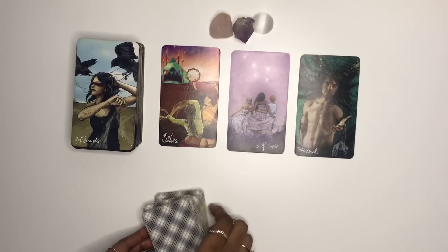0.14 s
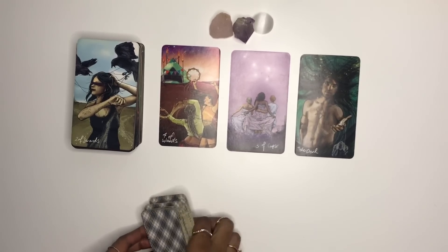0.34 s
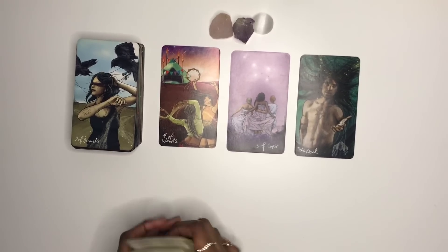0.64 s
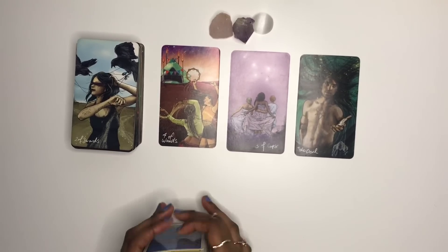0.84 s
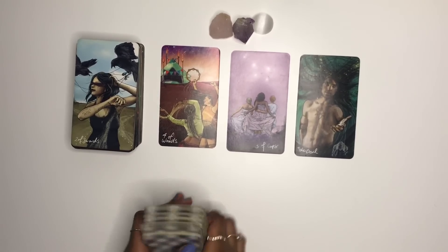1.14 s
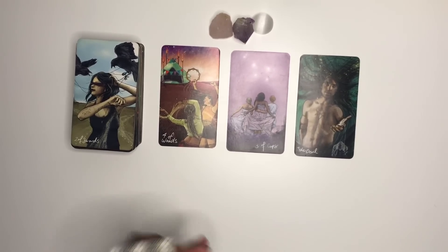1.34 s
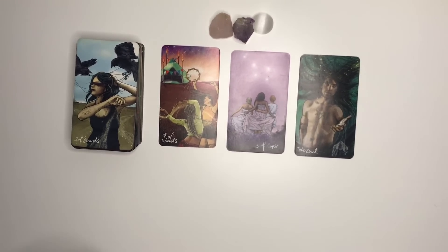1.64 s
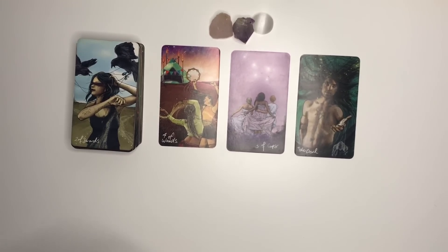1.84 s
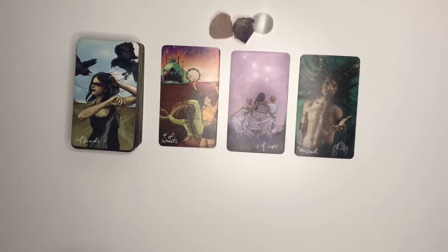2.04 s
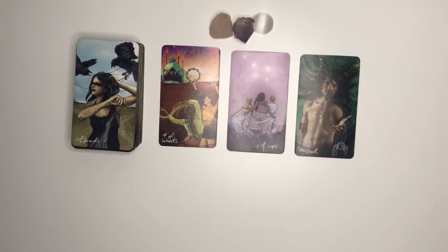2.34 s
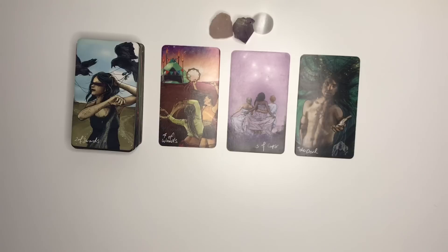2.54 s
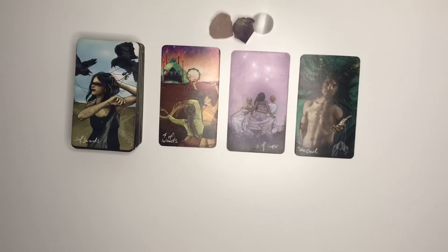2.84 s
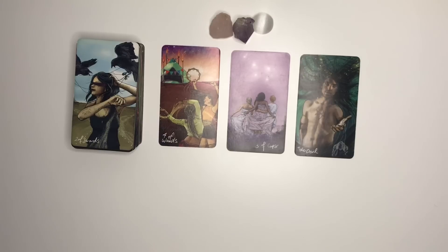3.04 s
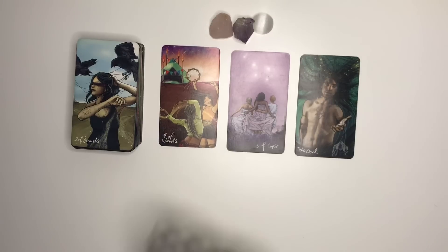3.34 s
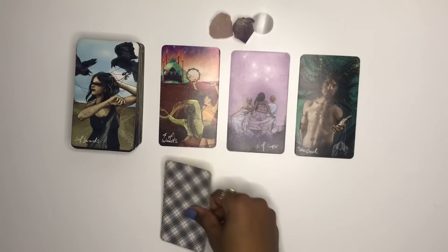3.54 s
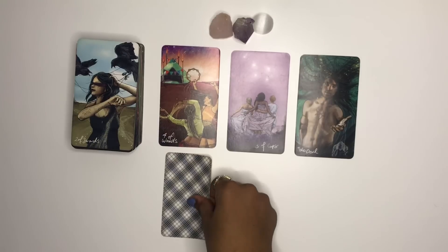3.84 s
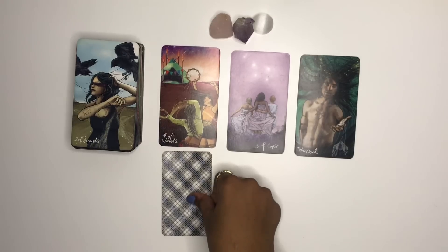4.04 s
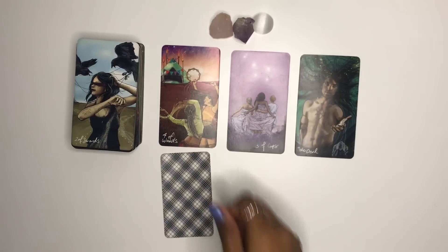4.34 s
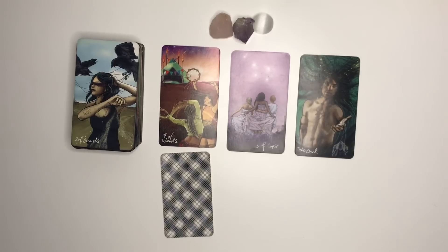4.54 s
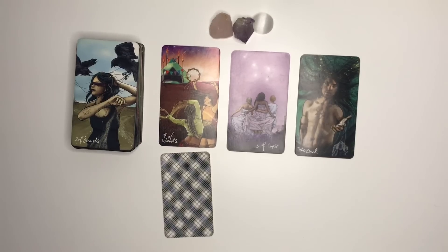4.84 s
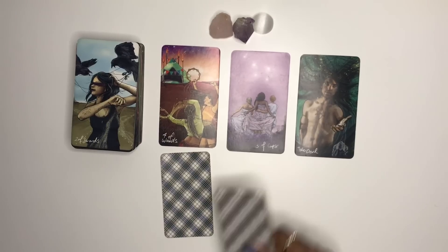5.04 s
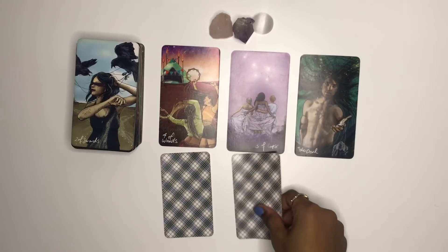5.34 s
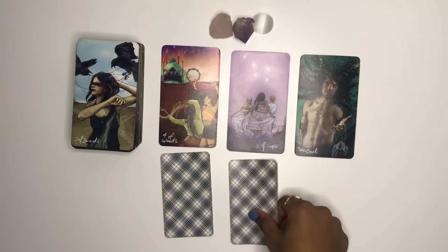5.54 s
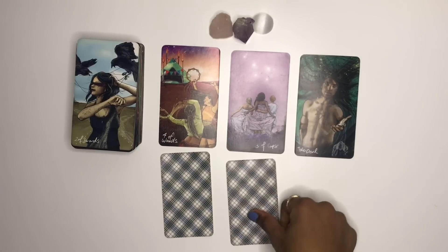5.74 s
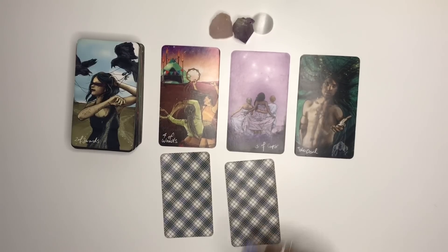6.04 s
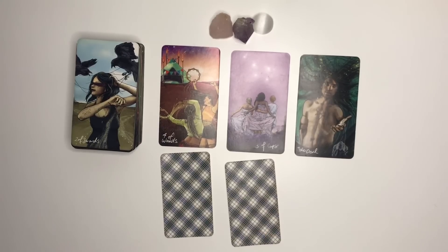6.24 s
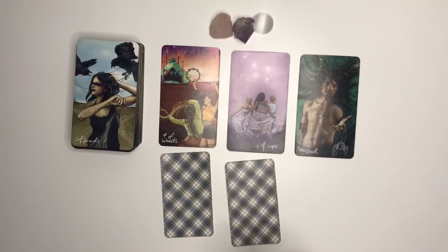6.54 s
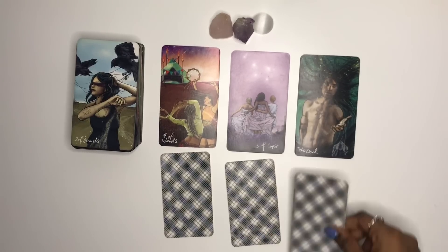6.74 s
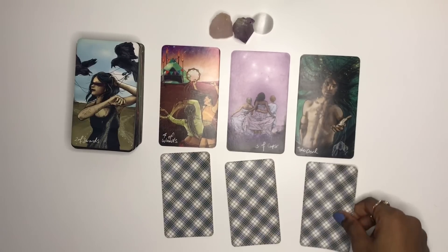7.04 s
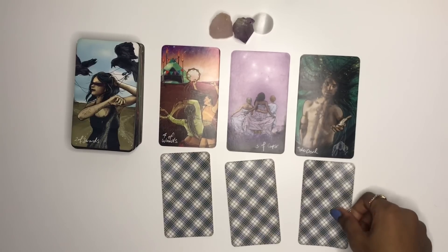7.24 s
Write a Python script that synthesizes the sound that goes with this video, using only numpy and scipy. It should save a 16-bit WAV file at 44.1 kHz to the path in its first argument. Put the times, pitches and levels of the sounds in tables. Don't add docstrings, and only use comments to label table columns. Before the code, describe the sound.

A close, mono view of cards handled at a wooden table in a small quiet room with faint bassy air and a short tail. From 0 to 0.7 s there are soft low hand thumps, light ticks and rustle. At about 0.83 and 1.04 s the deck halves slap together in tight clattering bursts, with a little friction and a thin high flick at 1.42. Three crisp woody edge knocks follow at 1.91, 2.09 and 2.30 s, the last slightly softer. Almost quiet until a loud, sharp card snap at 3.32, then clicks and a papery slide at 3.6-4.05 as the card is set down and pressed. A small early slip at 4.91 leads into a second snap at 4.94, with sliding and taps from 5.2 to 5.8. A third snap comes at 6.56, then light placing ticks, short slides and clear little clicks at 7.27 and 7.35.

```python
import sys
import numpy as np
from scipy import signal
from scipy.io import wavfile
from scipy.ndimage import uniform_filter1d

SR = 44100
rng = np.random.default_rng(int(sys.argv[2]) if len(sys.argv) > 2 else 0)


def pcm_store(signal):
    levels = np.round(np.clip(np.atleast_2d(signal), -1, 1) * 32767)
    wavfile.write(sys.argv[1], SR, levels.astype(np.int16).T)


def volts_from_decibels(level):
    exponent = np.asarray(level, float) / 20
    return 10 ** exponent


N = 325437

# frequency_hz, density_db [dB per Hz]
AIR_SPECTRUM = [(25, -54), (45, 7.5), (110, -3), (250, -12.5), (1000, -20.5), (8000, -33), (12500, -30.5),
                (16000, -34.5)]

# middle_s, length_s, hiss_db, rustle_db
CARD_SWISHES = [(0.017, 0.027, -60.5, -51.5), (1.547, 0.028, -53, -73), (0.266, 0.042, -44.5, -48),
                (0.547, 0.057, -51, -49.5), (0.738, 0.025, -45, -30), (1.253, 0.024, -47.5, -47.5),
                (1.348, 0.029, -43.5, -37.5), (2.982, 0.041, -48, -54), (3.305, 0.075, -32.5, -43),
                (4.053, 0.017, -48, -34), (4.634, 0.024, -41.5, -43), (6.105, 0.081, -49.5, -69),
                (6.283, 0.012, -62, -36), (6.561, 0.074, -36.5, -43.5)]
# frequency_hz, density_db [dB per Hz]
HISS_SPECTRUM = [(1000, 8), (2000, 4), (3500, 7.5), (6000, 8.5), (9000, 4), (13000, 5.5), (16000, 2.5)]
# frequency_hz, width_hz, level_db
RUB_BANDS = [(2080, 400, -5), (2980, 460, -1.5), (3850, 700, -3), (4800, 900, -19), (6000, 1100, -10.5)]

# start_s, hold_s, level_db, rise_s, fall_s
HAND_LEANS = [(0.03, 0.015, -22.5, 0.089, 0.21), (0.17, 0.036, -21.5, 0.059, .1),
              (0.28, 0.013, -21.5, 0.068, 0.11), (0.992, .004, -44, 0.074, .06),
              (1.14, 0.0036, -19, .13, 0.11), (3.946, .004, -39, 0.25, 0.17),
              (4.122, .004, -27.5, 0.18, 0.33), (5.382, .004, -29, 0.077, 0.08),
              (5.638, .004, -34.5, 0.36, 0.045), (5.848, 0.0037, -24.5, 0.19, 0.056),
              (6.96, 0.034, -34.5, 0.033, 0.18), (7.25, 0.043, -34, 0.17, 0.039)]
# start_s, hold_s, level_db, rise_s, fall_s
DECK_SQUEEZES = [(0.15, 0.13, -53.5, 0.54, 0.11), (0.728, 0.0044, -41.5, 0.097, 0.11),
                 (0.85, 0.043, -54, 0.061, 0.25), (1.034, 0.097, -39.5, 0.071, 0.11),
                 (1.36, .01, -52, 0.099, 0.21), (2.99, .02, -56.5, 0.51, 0.27),
                 (3.32, .004, -36, 0.0043, 0.13), (4.05, 0.11, -55.5, 0.03, 0.29),
                 (4.95, .004, -48, 0.11, 0.16), (6.338, 0.0084, -55.5, 0.56, 0.2),
                 (6.565, 0.026, -48.5, 0.0079, 0.1)]
# start_s, hold_s, level_db, rise_s, fall_s
CARD_DRAWS = [(0.45, 0.34, -63, 0.13, 0.15), (0.83, .003, -52, .004, 0.03), (1.14, .01, -52, 0.16, 0.1),
              (1.3, 0.23, -68, 0.08, 0.054), (2.65, 0.015, -67, 0.47, 0.28), (3.2, .11, -60.5, 0.31, 0.027),
              (3.33, 0.29, -70.5, 0.0073, 0.22), (4.042, 0.0045, -53, 0.057, 0.078),
              (4.514, 0.018, -70.5, 0.15, 0.56), (4.82, 0.16, -54, 0.093, 0.044),
              (5.765, 0.0045, -54.5, 0.15, 0.073), (6.48, 0.08, -58, 0.092, 0.032),
              (6.57, .11, -77, 0.0095, 0.17)]
# start_s, hold_s, level_db, rise_s, fall_s
HALVES_SPLAY = [(1.057, .002, -26.5, 0.0076, 0.056)]
# start_s, hold_s, level_db, rise_s, fall_s
CARD_DRAGS = [
    (3.745, 0.02, -39, 0.031, 0.14),
    (3.875, 0.02, -43, 0.015, 0.16),
    (4.0, .03, -54, 0.28, .06),
    (5.252, 0.14, -55.5, 0.15, 0.13),
    (5.42, 0.14, -53, 0.053, 0.36),
    (5.54, 0.0091, -45.5, 0.021, 0.087),
    (5.7, 0.049, -49, 0.14, 0.067),
    (7.0, 0.069, -53.5, 0.18, .06),
    (7.13, 0.081, -53, .05, 0.12),
    (7.285, 0.045, -44, 0.045, 0.091),
]
# hiss_db, rub_db, rustle_db, rumble_db
LEAN_LAYERS = (-50.5, -51, -40, 0.5)
SQUEEZE_LAYERS = (-24, -2.5, -0.5, -11)
DRAW_LAYERS = (-1, -5, -5, -15)
SPLAY_LAYERS = (-35, 2.5, -15, -19.5)
DRAG_LAYERS = (-15.5, 4, -14.5, -14)

# start_s, ring_db, pitch_hz, table_thump_db, crack_db
CARD_TOUCHES = [(0.1583, -44, 1830, 24, -5), (3.622, -24.5, 1940, -38, -18), (3.7219, -27, 2980, -7, -14),
                (3.7388, -5, 3760, -25, -26), (3.8349, -26.5, 2950, -11.5, -13),
                (3.8681, -8.5, 3210, -32.5, -14.5), (5.1983, -20.5, 2250, -40, -14),
                (5.4912, -27, 3200, -12.5, -25), (5.6876, -32, 3570, -10.5, -27),
                (6.8557, -24, 2110, -57, -48), (7.0905, -24, 3830, -15, -10), (7.1078, -22, 3860, -15, -29),
                (7.1362, -24.5, 3900, -30, -19), (7.1485, -28.5, 3900, -2, -12),
                (5.2821, -29.5, 2860, -23, -23), (5.772, -15.5, 5670, -21, -5),
                (7.208, -29.5, 3900, -7, -14.5), (7.2266, -31.5, 3850, -2, -10),
                (7.2455, -32, 3830, -16, -3), (7.3515, -6, 3960, -14.5, -2.5)]
# start_s, ring_db, pitch_hz, deck_body_db, crack_db
HAND_FIDGETS = [(0.3813, -35.5, 2170, -1.5, -27), (0.4548, -37.5, 1700, -1.5, 3), (0.52, -33.5, 3100, 0, 4),
                (0.5296, -33, 1920, -9, 1), (1.1485, -29, 4430, -11, -20), (1.1886, -26.5, 3650, -21, -1),
                (1.4872, -46.5, 3380, -12, 14), (1.6327, -45, 2400, 3.5, 9), (2.575, -42.5, 2000, -2, 5),
                (2.8434, -42.5, 1710, 6.5, -5), (3.243, -26, 4400, -10.5, -13.5),
                (4.4388, -32, 4300, 0, -9), (4.6126, -25.5, 1870, 3, -1), (4.6652, -25, 4630, -8, -0.5),
                (5.933, -46, 4510, 0, 0), (6.2667, -29.5, 2920, -2.5, -2), (6.2796, -32.5, 1900, 8, -2),
                (6.5237, -22, 1810, -10, -15)]
# start_s, ring_db, pitch_hz, deck_body_db, crack_db
SMALL_SCUFFS = [(3.2965, -21, 2900, -3.5, -1), (3.305, -25.5, 2300, -25, -4), (1.2, -39, 2800, -14, -17),
                (6.535, -23, 3500, -21, -10), (8.1, -29.5, 3800, -15, -3), (3.47, -42, 4200, -21, 1),
                (0.23, -34, 1830, 2, -8), (0.37, -41, 6400, -7, -14), (0.7213, -29, 1950, -5, -11),
                (0.84, -16, 2600, -4, -20), (1.1, -38, 3400, -3.5, -17), (4.3, -44, 4000, -23, -12.5),
                (8.6, -21, 2000, 10, -10), (4.618, -20.5, 4750, -10, -8.5)]
# start_s, ring_db, pitch_hz, table_thump_db, crack_db
HAND_PRESSES = [
    (4.0448, -18.5, 2880, 0, 3.5),
    (5.2775, -36, 3000, 3, -2.5),
    (5.5446, -17.5, 3020, -16, -18),
    (5.7715, -16, 4010, -11, 0.5),
    (6.9526, -32.5, 1790, -9, -18),
]
# start_s, peak_db, pitch_hz, decay_t60_s
FRAME_JOLTS = [
    (0.17, -24.5, 316, 0.061),
    (0.83, -33, 60, 0.22),
    (0.995, -27, 318, 0.18),
    (0.873, -17, 178, .17),
    (3.317, -22, 62, 0.26),
    (3.316, -20.5, 120, 0.16),
    (4.944, -29, 130.6, 0.36),
    (6.563, -26.5, 61, 0.2),
    (6.562, -19.5, 400, 0.17),
    (1.042, -20, 460, 0.068),
]
# start_s, ring_db, pitch_hz, table_thump_db, deck_body_db
HALF_SLAPS = [(0.827, -10.5, 1860, 2, 3), (0.834, -31, 2600, -16, -8), (0.839, 0, 2070, -10.5, -25),
              (0.8453, -8, 2080, -6, -9), (0.8588, -10, 1650, -10, -14), (0.8505, -17, 2280, -15, -4),
              (0.867, -15, 1910, -14, -6), (1.0385, -7.5, 2280, -31, -13), (1.0407, -2.5, 2080, -52, -38),
              (1.0522, -1.5, 1920, -26, -29), (1.054, -5, 2010, -38, -18), (1.0455, -15, 2300, -22, -18),
              (1.0599, -16, 2600, -32, -20), (1.066, -29, 2830, -22, -15)]
# start_s, ring_db, pitch_hz, table_thump_db, crack_db
NAIL_FLICKS = [
    (1.4243, -19, 6500, -33, 0),
    (7.126, -31.5, 3920, -2.5, -22),
    (7.2742, -3.5, 3865, -30, -13),
]
# start_s, ring_db
EDGE_KNOCKS = [
    (1.9135, -3.5),
    (2.0932, -4),
    (2.2962, -5.5),
]
# pitch_hz, table_thump_db, deck_body_db, crack_db
KNOCK_SHARES = (2029, -30, -10, -6)
# start_s, ring_db, pitch_hz
EDGE_LANDINGS = [
    (1.9143, -2, 2020),
    (2.0939, -4.5, 1980),
    (2.2976, -3.5, 2040),
]
# start_s, peak_db, first_hz, last_hz, length_s
CARD_WHIPS = [
    (3.3157, 1, 8730, 2940, .0022),
    (4.9438, -8.5, 7020, 2510, 0.0027),
    (6.5602, -10, 15070, 3960, .002),
]
# start_s, ring_db, pitch_hz, deck_body_db, crack_db
CORNER_SCRAPES = [
    (3.3162, -1, 3700, -25.5, -14),
    (4.9106, -14.5, 2875, -30, -10),
    (4.9442, -2, 3880, -34.5, -9),
    (6.5602, -2.5, 4030, -42, -3),
]
# start_s, ring_db, pitch_hz, deck_body_db, crack_db
CARD_SNAPS = [
    (3.3171, 1, 1750, -12, -18),
    (4.9108, -10.5, 1984, -7.5, -21.5),
    (4.9453, -3.5, 1860, -6, -11),
    (4.9548, -14, 1700, -17, 3),
    (6.5612, -2.5, 1810, -16.5, -18),
]
# start_s, ring_db, pitch_hz
DECK_FLEXES = [
    (3.3176, -3, 690),
    (4.9114, -16, 560),
    (4.9462, -13, 520),
    (4.9579, -12, 634),
    (6.5661, -9, 990),
]

# multiple, level_db, decay_t60_s
TICK_MODES = [(.55, -4.5, 0.007), (0.748, 0, 0.006), (1, 4.5, 0.007), (1.35, 1, 0.004), (1.8, 3, 0.0033)]
SLAP_MODES = [(.65, -7, 0.0051), (1, 6, 0.011), (1.27, 0, 0.014), (1.75, 1, 0.0067), (2.2, -3.5, 0.0063),
              (2.7, -3.5, 0.0046)]
FLICK_MODES = [(.485, -3, 0.013), (1, 6, 0.02), (1.179, -10, 0.01), (1.4, -7, .005), (1.88, 1.5, .005)]
KNOCK_MODES = [(.8, -24, .004), (1, 4, 0.0059), (1.47, -5, 0.005), (1.65, -3, 0.011), (2.2, -14, 0.004),
               (2.72, -9.5, 0.005)]
LANDING_MODES = [(1, -5, 0.015), (1.66, -12.5, 0.0049), (2.2, -21, 0.0046)]
CORNER_MODES = [(.76, -3, .005), (1, 1, .005), (1.39, 2.5, 0.0063), (1.76, 0, .0045), (2.27, -7.5, .003)]
SNAP_MODES = [(0.6, -25, 0.024), (1, 8, 0.011), (1.25, -26, .005), (1.58, 1.5, 0.006)]
FLEX_MODES = [(1, 2, 0.014), (1.35, -7, 0.01)]

# frequency_hz, level_db, decay_t60_s
TABLE_MODES = [(128.7, -4, 0.2), (154, -8, 0.2), (176.9, 0.5, 0.29), (294.2, -4, 0.06), (392, -8.5, 0.14)]
# frequency_hz, level_db, decay_t60_s
LOOSE_DECK_MODES = [(350, -5.5, 0.016), (478, -3, 0.077), (510, -9.5, 0.15), (696, 18, 0.024),
                    (970, -40.5, 0.019)]
# frequency_hz, level_db, decay_t60_s
PILE_MODES = [(290, -3.5, 0.011), (405, -12.5, 0.091), (692, 0, 0.044), (891, 1.5, 0.063), (1010, 5, 0.018),
              (1263, -23, 0.011)]
# frequency_hz, level_db, decay_t60_s
BLOCK_MODES = [(317, -8, 0.029), (404, -13.5, 0.058), (480, -14, 0.024), (555, -14.5, 0.047),
               (692, -9, 0.07), (760, -6, 0.03), (854, -2, 0.029), (950, -5.5, 0.026)]
# frequency_hz, level_db, decay_t60_s
THUMBED_DECK_MODES = [(480, 1, 0.021), (590, -13.5, 0.06), (636, 3.5, 0.015), (705, 8, 0.016),
                      (990, 2, 0.032)]
# frequency_hz, level_db, decay_t60_s
BOARD_MODES = [(318, -4, .18), (398, -5, .17), (545, -8, .18), (596, -2, .14), (686, 0, .12), (760, -8, .2),
               (875, -8, .13), (1000, -4, .18), (1158, -9, .17), (1351, -8, .07), (1735, -10, .14),
               (1870, -12, .12), (2180, -10, .14)]

# delay_s, level_db
WALL_ECHOES = [
    (.0097, -17.5),
    (0.0184, -17.5),
    (0.0258, -22),
]
# frequency_hz, decay_t60_s, level_db
ROOM_DECAY = [(121, 0.066, -7.5), (328, 0.22, 5.5), (862, 0.23, -2.5), (2320, 0.21, -4), (6000, 0.18, -4),
              (12150, 0.073, 0.5)]


def evened(x):
    return x / np.sqrt(np.mean(x ** 2) + 1e-20)


def peaked(x):
    return x / (abs(x).max() + 1e-12)


def read(points, hz):
    f, value = np.transpose(points)
    return np.interp(np.log(hz + 1), np.log(f + 1), value)


def add(mix, start_s, sound):
    part = mix[round(start_s * SR):][:len(sound)]
    part += sound[:len(part)]


def resonance(hz, centre_hz, width_hz):
    return 1 / np.hypot(1, 2 * (hz - centre_hz) / width_hz) ** 2


def hiss_colour(hz):
    return volts_from_decibels(read(HISS_SPECTRUM, hz)) * (hz > 1500)


def noise(gain, patchy_db, wander=0.):
    frames, hz = N // 256 + 5, np.fft.rfftfreq(1024, 1 / SR)
    a, b, patches = rng.standard_normal((frames, 513, 3)).T
    patches = uniform_filter1d(patches, size=12, axis=0)
    patches = evened(uniform_filter1d(patches, size=10, axis=1))
    drift = uniform_filter1d(uniform_filter1d(a[0], size=14), size=14)
    drift = 1 + wander * evened(drift)
    z = (a + 1j * b) * gain(hz[:, None] * drift) * volts_from_decibels(patchy_db * patches)
    return evened(signal.istft(z, nperseg=1024, noverlap=768)[1][:N])


def ring(blow, modes, base_hz=1, lag=0):
    t = np.arange(SR // 3) / SR
    body = 0
    for k, (f, db, t60) in enumerate(modes):
        late = np.maximum(t - lag / (base_hz * f), 0)
        decay = volts_from_decibels(db - 60 * late / t60)
        body = body + (-1) ** k * decay * np.sin(2 * np.pi * base_hz * f * late)
    return peaked(signal.fftconvolve(body, blow))


def surge(t, peak_s):
    return t / peak_s * np.exp(1 - t / peak_s)


def hits(rows, card, deck, ragged, contact_s, crack_s, push_s, spread, lag):
    near, spreading = np.zeros((2, N))
    t = np.arange(600) / SR
    click = np.pad(np.hanning(6), (0, 594))
    treble = signal.butter(1, [5200, 14000], "band", fs=SR)
    blurred = [(f, db, 0.5 * t60) for f, db, t60 in card]
    push = surge(t, push_s)
    for s, db, hz, thump_db, deck_db, crack_db in rows:
        grit = rng.standard_normal((2, len(t)))
        detune = 1 + spread * (2 * rng.random(len(deck)) - 1)
        gripped = [(f * k, d, t60) for (f, d, t60), k in zip(deck, detune)]
        body = volts_from_decibels(db + deck_db) * ring(push, gripped, lag=lag)
        blow = np.roll(click, round(contact_s * SR)) + ragged * grit[0] * surge(t, contact_s)
        stock = volts_from_decibels(db) * ring(blow, card, hz, lag)
        crack = volts_from_decibels(db + crack_db) * peaked(signal.lfilter(*treble, grit[1]) * surge(t, crack_s))
        thump = volts_from_decibels(db + thump_db) * ring(push, TABLE_MODES)
        for part in body, stock, crack, thump:
            add(near, s, part)
        add(spreading, s, body)
        smooth_stock = ring(click, blurred, hz)
        smooth_crack = signal.lfilter(*treble, t == 0)
        for part, smooth in (stock, smooth_stock), (crack, smooth_crack):
            add(spreading, s, smooth * np.linalg.norm(part) / np.linalg.norm(smooth))
    return np.array([near, spreading])


def in_hand(rows, thump_db):
    return [(s, db, hz, thump_db, deck_db, crack_db) for s, db, hz, deck_db, crack_db in rows]


def on_table(rows, deck_db, coupled=False):
    return [(s, db, hz, thump_db, deck_db + coupled * thump_db, crack_db)
            for s, db, hz, thump_db, crack_db in rows]


def bounce_cancelled(blows):
    near, spreading = blows
    return signal.lfilter(*signal.iirnotch(1305, 5.2, SR), near), spreading


def room_air():
    return volts_from_decibels(-48.5) * noise(lambda hz: volts_from_decibels(read(AIR_SPECTRUM, hz)), 0.94)


def swishes():
    t = np.arange(N) / SR
    hiss = noise(hiss_colour, 1.1)
    rustle = noise(lambda hz: 1 / np.hypot(1, hz / 3500) ** 2 / np.hypot(1, 450 / (hz + 1)) ** 2, 2.2)
    out = np.zeros(N)
    for s, length, hiss_db, rustle_db in CARD_SWISHES:
        swell = np.exp(-.5 * ((t - s) / (length / 2)) ** 2)
        out += swell * (volts_from_decibels(hiss_db) * hiss + volts_from_decibels(rustle_db) * rustle)
    return out


def strokes():
    t, power = np.arange(0, N + 64, 64) / SR, 1e-12
    kinds = [(HAND_LEANS, LEAN_LAYERS), (DECK_SQUEEZES, SQUEEZE_LAYERS), (CARD_DRAWS, DRAW_LAYERS),
             (HALVES_SPLAY, SPLAY_LAYERS), (CARD_DRAGS, DRAG_LAYERS)]
    for rows, layers_db in kinds:
        s, hold, db, rise, fall = np.transpose(rows)[:, :, None]
        before = np.maximum(s - t, 0) / abs(rise)
        after = np.maximum(t - s - abs(hold), 0) / abs(fall)
        effort = (volts_from_decibels(db - 20 * (before + after)) ** 2).sum(axis=0)
        power = power + volts_from_decibels(np.array(layers_db))[:, None] ** 2 * effort
    return [np.interp(np.arange(N) / SR, t, 10 * np.log10(p)) for p in power]


def slides():
    hiss_db, rub_db, rustle_db, rumble_db = strokes()
    grit = volts_from_decibels(1.8 * evened(uniform_filter1d(rng.standard_normal(N), size=180)))
    hiss = noise(hiss_colour, 1.9)
    rub = noise(lambda hz: sum(volts_from_decibels(db) * resonance(hz, f, w) for f, w, db in RUB_BANDS), 2.5, wander=.05)
    rustle = noise(lambda hz: resonance(hz, 720, 750), 2.)
    rumble = noise(lambda hz: sum(volts_from_decibels(db) * resonance(hz, f, 30) for f, db, _ in TABLE_MODES), 3.)
    slips = rng.exponential(1, N) ** 3 * (rng.random(N) < 220 / SR)
    catches = volts_from_decibels(3.6 * uniform_filter1d(slips, size=70) * 35)
    catches = np.minimum(catches, 2.6)
    card_sound = volts_from_decibels(hiss_db + 12.0) * hiss
    card_sound += volts_from_decibels(rub_db - 3.5) * rub * catches
    card_sound += volts_from_decibels(rustle_db + 2.5) * rustle
    return grit * card_sound + volts_from_decibels(rumble_db - 15.5) * rumble


def ticks():
    rows = in_hand(HAND_FIDGETS, thump_db=-26) + on_table(CARD_TOUCHES, deck_db=-46)
    rows += on_table(HAND_PRESSES, deck_db=2.5, coupled=True) + in_hand(SMALL_SCUFFS, thump_db=-34)
    return hits(rows, TICK_MODES, LOOSE_DECK_MODES, ragged=0.38, contact_s=0.000666, crack_s=0.0011,
                push_s=0.00032, spread=0.063, lag=0.44)


def jolts():
    out = np.zeros(N)
    for s, db, hz, t60 in FRAME_JOLTS:
        add(out, s, volts_from_decibels(db) * ring(np.hanning(100), [(hz, 0, t60)]))
    return out


def slaps():
    rows = [(*row, -30) for row in HALF_SLAPS]
    return hits(rows, SLAP_MODES, PILE_MODES, ragged=0.28, contact_s=0.00097, crack_s=0.00093,
                push_s=0.0001, spread=0.086, lag=0.066)


def flicks():
    return hits(on_table(NAIL_FLICKS, deck_db=-51.0), FLICK_MODES, LOOSE_DECK_MODES, ragged=0.23,
                contact_s=0.001013, crack_s=0.00035, push_s=0.00021, spread=0.026, lag=0.24)


def knocks():
    rows = [(*row, *KNOCK_SHARES) for row in EDGE_KNOCKS]
    return bounce_cancelled(hits(rows, KNOCK_MODES, BLOCK_MODES, ragged=0.08, contact_s=0.0003,
                                 crack_s=0.0006, push_s=.0001, spread=0.028, lag=.3))


def landings():
    rows = [(*row, -40, -30, -30) for row in EDGE_LANDINGS]  # thump, body, crack dB
    return bounce_cancelled(hits(rows, LANDING_MODES, BLOCK_MODES, ragged=0.1, contact_s=.0008,
                                 crack_s=0.0008, push_s=0.0002, spread=0.03, lag=.1))


def whips():
    out = np.zeros(N)
    for s, db, first_hz, last_hz, length in CARD_WHIPS:
        u = np.arange(0, length, 1 / SR) / length
        pitch_hz = first_hz * (last_hz / first_hz) ** u
        glide = np.sin(2 * np.pi * np.cumsum(pitch_hz) / SR)
        add(out, s, volts_from_decibels(db) * glide * np.sin(np.pi * u) ** .6)
    return out


def corners():
    return hits(in_hand(CORNER_SCRAPES, thump_db=-49.5), CORNER_MODES, THUMBED_DECK_MODES, ragged=0.61,
                contact_s=.001, crack_s=0.00049, push_s=0.00018, spread=0.04, lag=0.56)


def snaps():
    return hits(in_hand(CARD_SNAPS, thump_db=-41.0), SNAP_MODES, THUMBED_DECK_MODES, ragged=0.26,
                contact_s=.0007, crack_s=0.0005, push_s=0.00011, spread=0.041, lag=0.69)


def flexes():
    rows = [(*row, -40, -30, -40) for row in DECK_FLEXES]  # thump, body, crack dB
    return hits(rows, FLEX_MODES, THUMBED_DECK_MODES, ragged=0.1, contact_s=.0005, crack_s=0.0008,
                push_s=0.0002, spread=0.03, lag=.1)


def echoes(x):
    out, dull = np.zeros(N), signal.lfilter(*signal.butter(2, 3600, fs=SR), x)
    for s, db in WALL_ECHOES:
        add(out, s, volts_from_decibels(db) * dull)
    return out


def room(x, first_s=0.0033):
    out, count = np.zeros(N), SR // 40
    turn = np.arange(N) / SR * 2.3
    walls = np.array(ROOM_DECAY)
    for k in range(3):
        taps = np.zeros(SR // 2)
        taps[np.arange(count) * 20 + rng.integers(0, 20, count)] = rng.choice([-1., 1.], count)
        hz, t, z = signal.stft(taps, SR, nperseg=256)
        t60 = read(walls[:, :2], hz)[:, None]
        db = read(walls[:, ::2], hz)[:, None]
        tail = signal.istft(z * volts_from_decibels(db - 60 * t / t60), SR, nperseg=256)[1]
        tail *= np.clip(np.arange(len(tail)) / SR / first_s - 1, 0, 1) / np.sqrt(200)
        share = np.cos(2 * np.pi * (turn + k / 3)) * np.sqrt(2 / 3)
        out += signal.fftconvolve(x * share, tail)[:N]
    return out


def board(x):
    modes = ring(np.ones(1), BOARD_MODES)
    swell = 1 - np.exp(-np.arange(len(modes)) / SR / .004)
    return signal.fftconvolve(x, modes * swell)[:N]


def scene():
    blows = [(ticks(), 1.5), (slaps(), 2.0), (flicks(), -2.0), (knocks(), -1.3), (landings(), -0.4),
             (corners(), -2.5), (snaps(), -2.1), (flexes(), 0.3)]
    near = sum(direct for (direct, _), _ in blows)
    spreading = sum(volts_from_decibels(wet_db) * sideways for (_, sideways), wet_db in blows)
    reflected = echoes(near) + volts_from_decibels(3.5) * room(spreading) + volts_from_decibels(-33.5) * board(spreading)
    mix = near + reflected + room_air() + swishes() + slides() + jolts() + whips()
    return mix[None]


def low_pass(x):
    return signal.sosfilt(signal.butter(12, 16550, fs=SR, output="sos"), x)


def record(dry):
    power_db = 10 * np.log10(abs(uniform_filter1d(dry[0] ** 2, size=300)) + 1e-12)
    fall = np.arange(N) * 32.0 / SR
    over_db = np.maximum(np.maximum.accumulate(power_db + fall) - fall + 12.5, 0)
    ducked = dry / volts_from_decibels(0.035 * uniform_filter1d(over_db, size=400, origin=199))
    bassless = signal.sosfilt(signal.butter(4, 40, "high", fs=SR, output="sos"), ducked)
    port = 0.49 * bassless + 0.4 * signal.lfilter(*signal.iirnotch(10500, 9, SR), bassless)
    lowpass = signal.firwin(255, 15900, window=("kaiser", 6), fs=SR)
    band = signal.oaconvolve(port, lowpass[None], "same")
    return low_pass(np.clip(band, -1, 1))


dry = scene()
out = record(dry)
pcm_store(out)
```